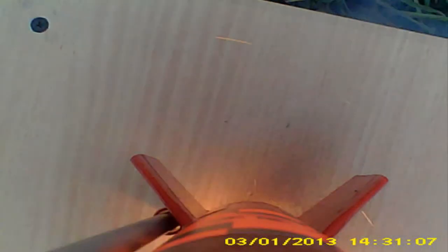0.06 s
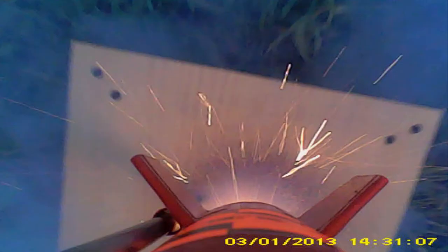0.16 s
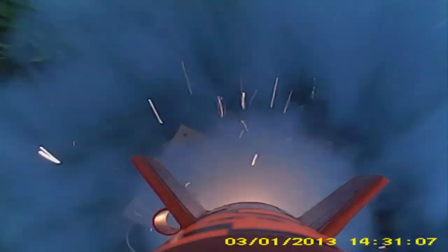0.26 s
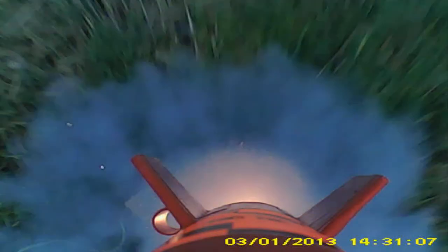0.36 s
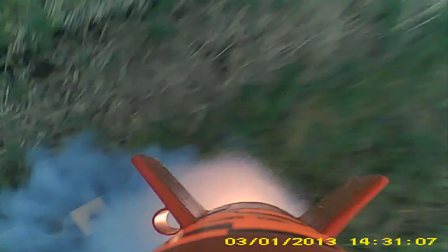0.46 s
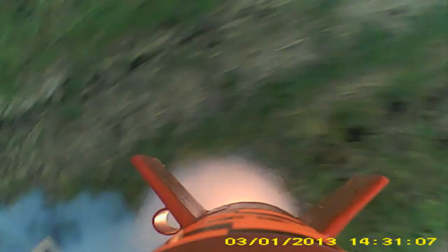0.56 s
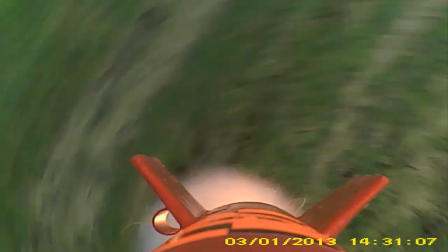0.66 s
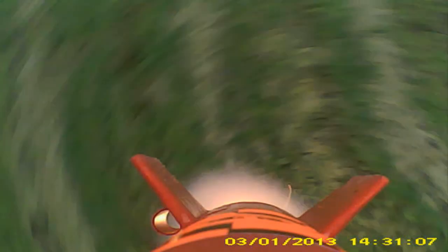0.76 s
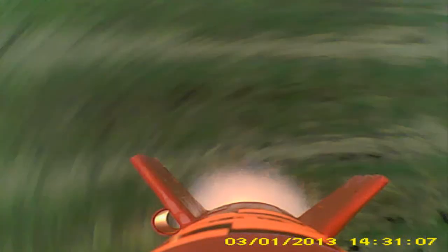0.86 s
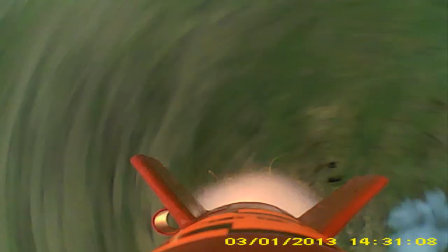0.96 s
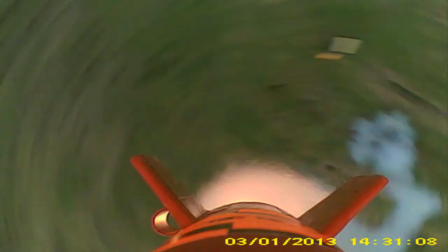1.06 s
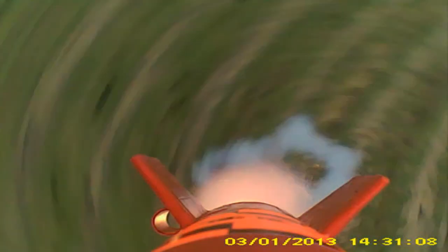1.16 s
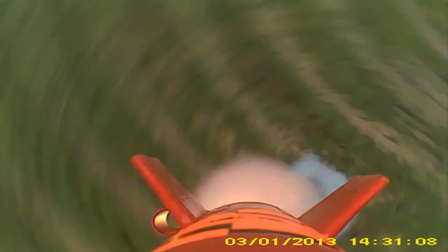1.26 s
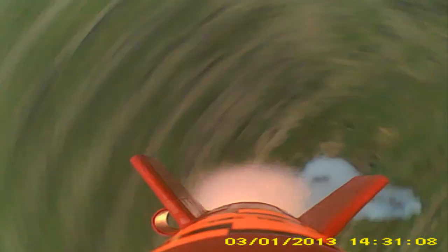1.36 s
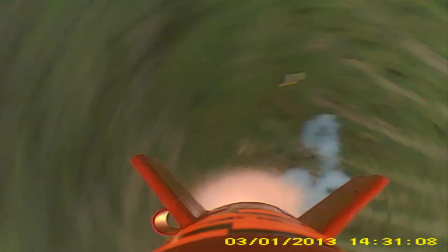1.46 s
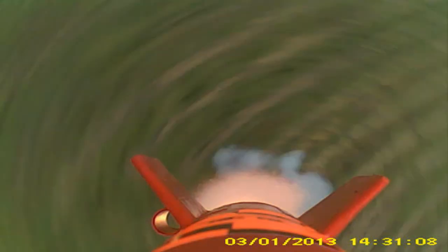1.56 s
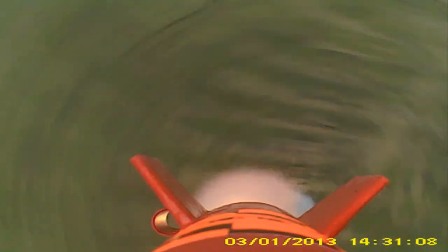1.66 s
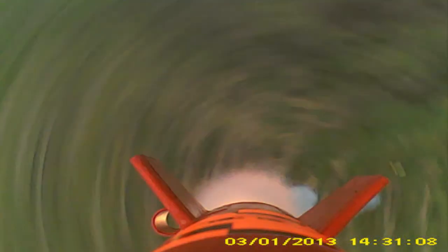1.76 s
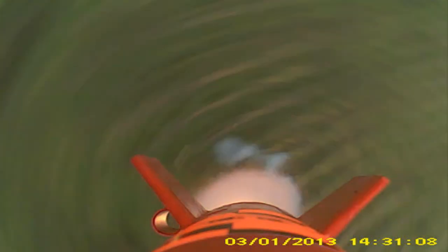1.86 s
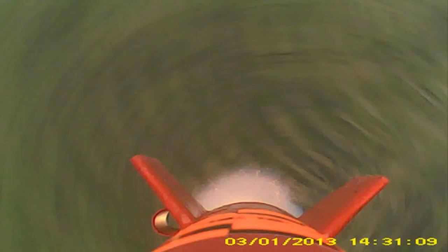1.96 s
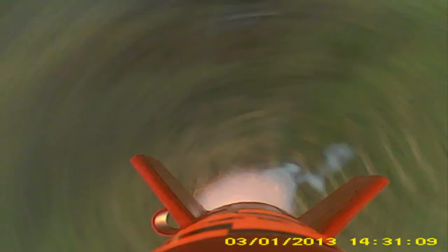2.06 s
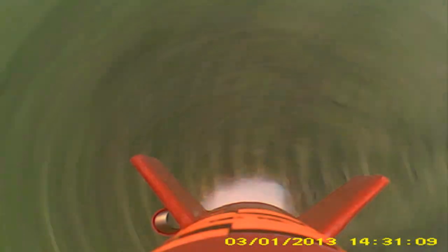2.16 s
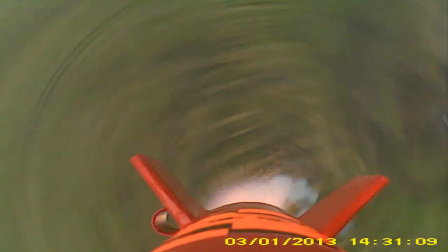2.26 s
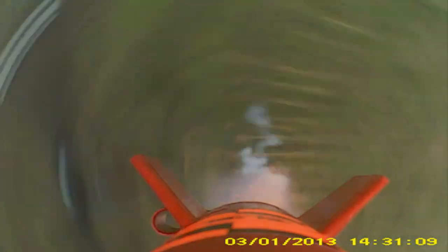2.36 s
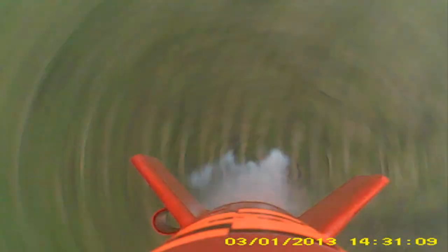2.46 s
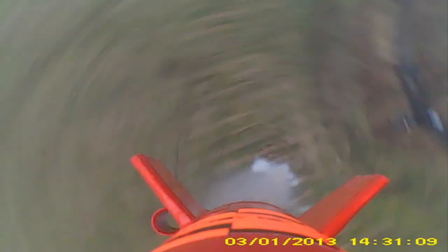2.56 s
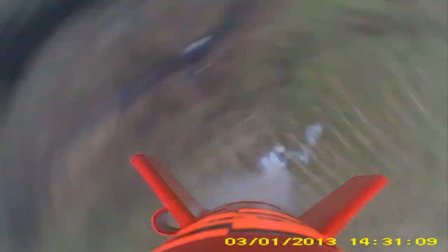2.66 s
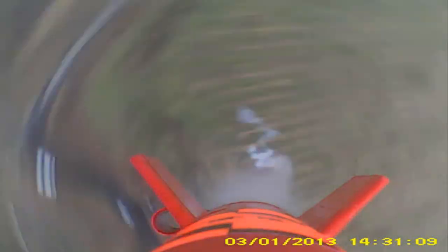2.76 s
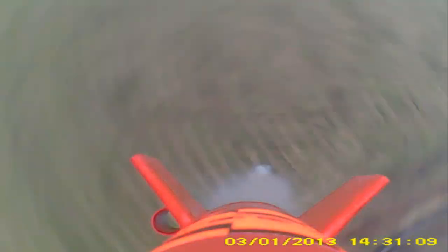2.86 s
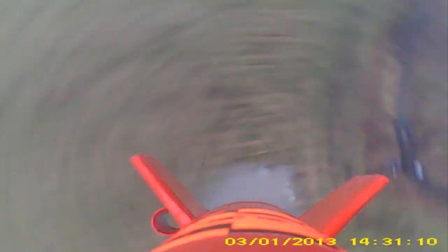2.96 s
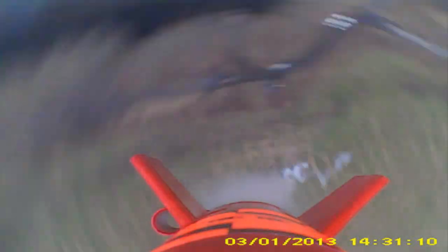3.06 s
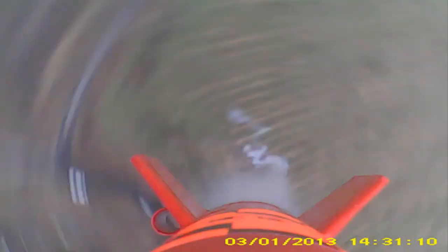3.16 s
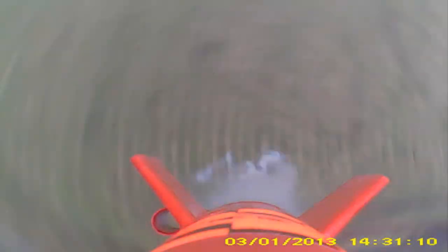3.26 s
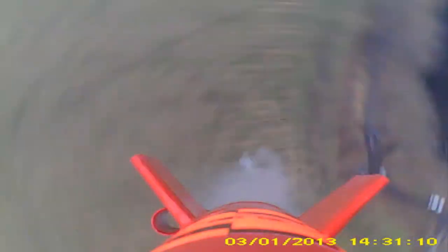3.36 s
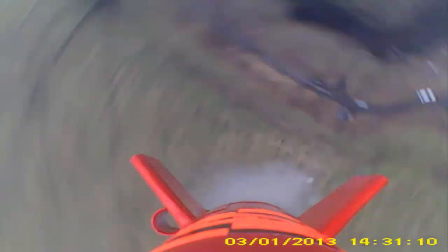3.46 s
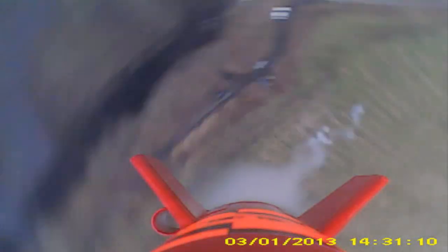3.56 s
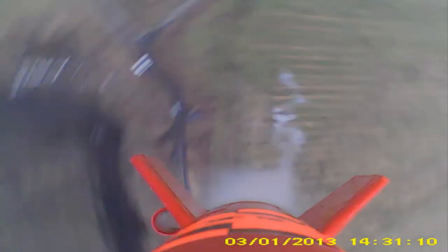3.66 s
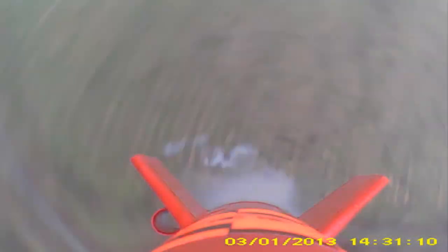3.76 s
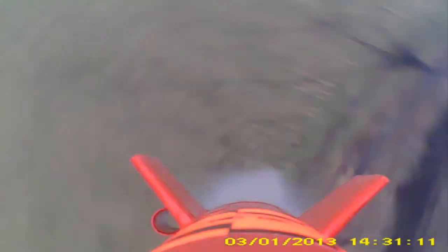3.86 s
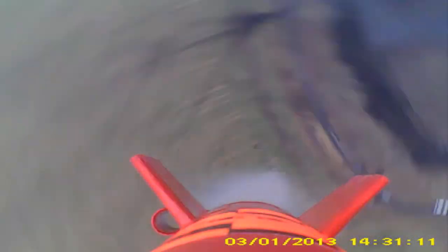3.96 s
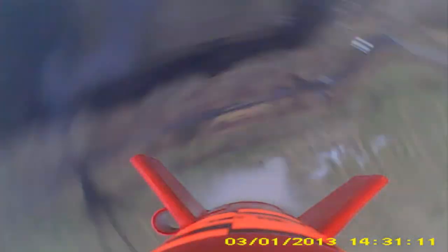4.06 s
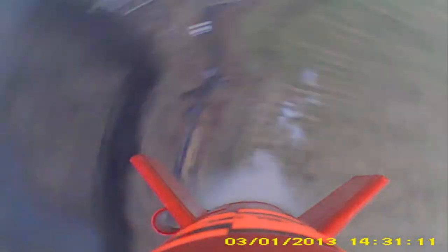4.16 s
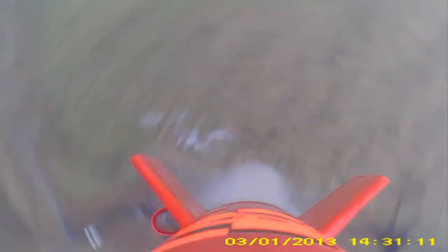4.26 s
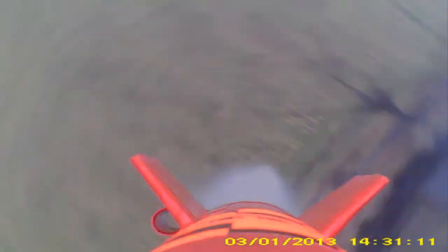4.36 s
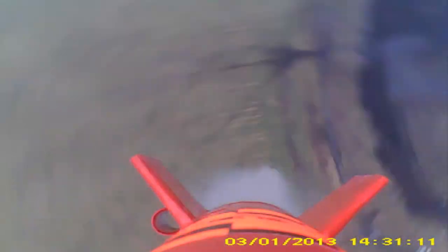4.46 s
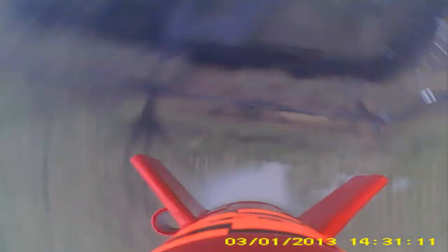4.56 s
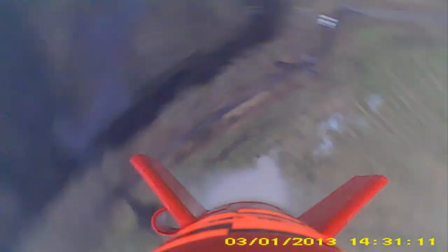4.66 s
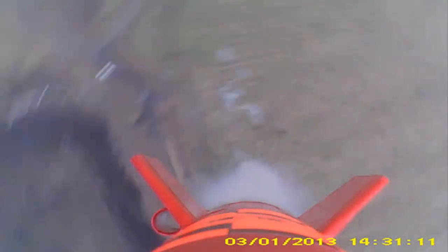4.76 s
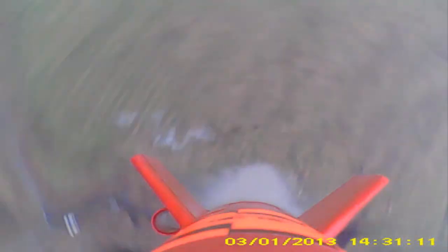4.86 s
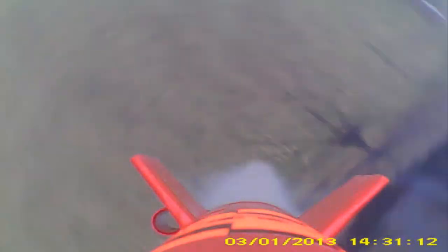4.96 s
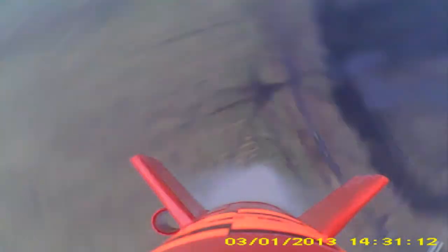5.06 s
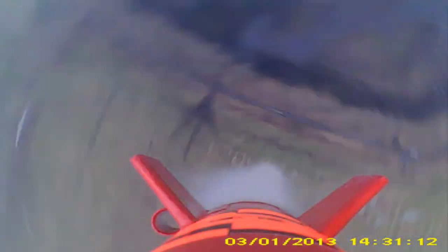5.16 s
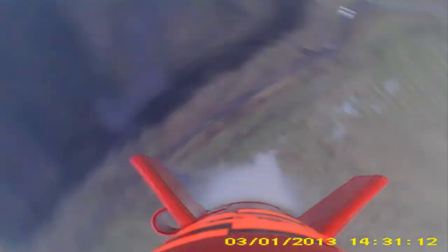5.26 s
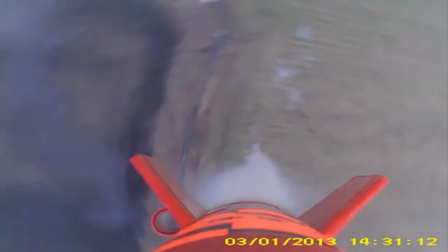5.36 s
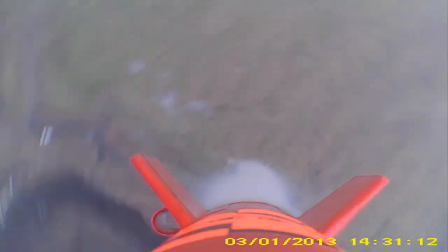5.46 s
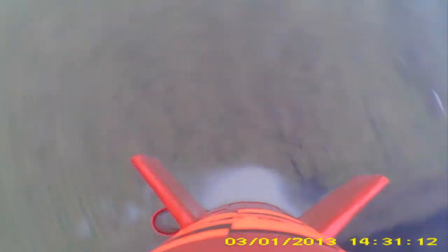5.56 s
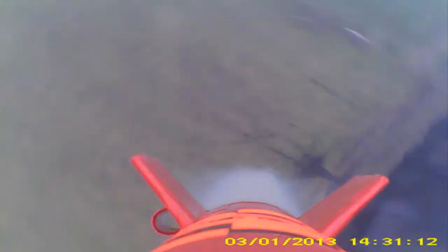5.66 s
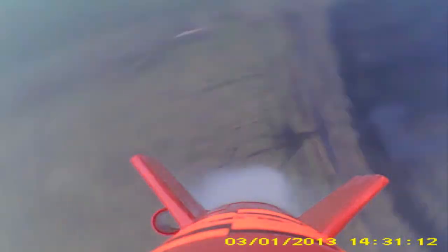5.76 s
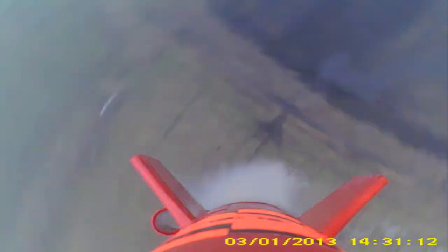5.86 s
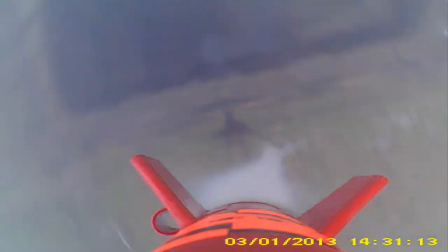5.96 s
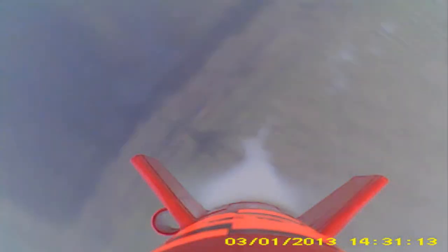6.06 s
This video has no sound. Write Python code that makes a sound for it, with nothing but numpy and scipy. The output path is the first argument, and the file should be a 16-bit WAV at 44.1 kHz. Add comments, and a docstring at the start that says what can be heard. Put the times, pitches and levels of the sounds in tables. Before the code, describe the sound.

Heard from a small onboard microphone, a rocket motor spits and roars alight, then buffeting air hisses and crackles as it coasts.

```python
"""A model rocket's exhaust and slipstream roar through the case of a small camera riding on it.
The igniter spits, the motor lights, the rocket climbs and coasts; a hollow rush of air swells at the end.
Eddies slam the tiny microphone against its stop, thousands of times a second at top speed (a harsh
hiss), then ever more rarely (a crackle) as the rocket slows."""
import sys
import numpy as np
from scipy import signal
from scipy.fft import rfft, irfft, next_fast_len
from scipy.io import wavfile
from scipy.ndimage import uniform_filter1d

SR = 44100
rng = np.random.default_rng(int(sys.argv[2]) if len(sys.argv) > 2 else 0)


def master(y):
    """Save y as 16-bit WAV."""
    cut = np.clip(np.atleast_2d(y).T, -1, 1)
    pcm = np.round(cut * 32767)  # scale
    wavfile.write(sys.argv[1], SR, pcm.astype(np.int16))


N = 269892
TIME = np.arange(N) / SR
IGNITION_S, LIFTOFF_S, CLEAR_S, BURNOUT_S = .127, .3, .503, 2.3


def undb(db):
    """Decibels to gain."""
    return 10 ** (np.asarray(db) / 20)


def unit(x):
    """Scale to rms 1."""
    return x / np.std(x)


def rise(at_s, length_s):
    """Smooth 0-to-1 step centred on at_s."""
    return .5 + .5 * np.tanh(2 * (TIME - at_s) / length_s)


def lowpass(x, hz):
    """One-pole low-pass."""
    pole = np.exp(-2 * np.pi * hz / SR)
    return signal.lfilter([1 - pole], [1, -pole], x)


def colour(x, spectrum):
    """Filter by (frequency [Hz], gain [dB]) points."""
    hz, db = np.transpose(spectrum)
    size = next_fast_len(N + 4096)
    bin_hz = np.maximum(np.arange(size // 2 + 1) * SR / size, 1)
    gain = undb(np.interp(np.log(bin_hz), np.log(hz), db))
    return irfft(rfft(x, size) * gain, size)[:N]


def flutter(rate_hz):
    """Ramps between random levels, rms 1."""
    hold = max(int(SR / rate_hz), 1)
    steps = np.repeat(rng.standard_normal(N // hold + 1), hold)
    return unit(uniform_filter1d(steps, hold)[:N])


def turbulence(spectrum):
    """Coloured flow noise, rms 1."""
    return unit(colour(rng.standard_normal(N), spectrum))


def resonance(hz, width_hz):
    """Noise band whose centre may move, rms 1."""
    real, imag = rng.standard_normal((2, N))
    baseband = lowpass(lowpass(real + 1j * imag, width_hz / 2), 2 * width_hz)
    carrier = np.exp(2j * np.pi * np.cumsum(hz * np.ones(N)) / SR)
    return unit(np.real(baseband * carrier))


# Igniter spits: (time [s], level [dB])
IGNITER_SPITS = [(0.0016, -12.5), (0.012, -13), (0.02, -14.5), (0.029, -13.5), (0.035, -10), (0.046, -12),
                 (0.0537, -13), (0.062, -7), (0.067, -24), (0.074, -11), (0.0809, -5), (0.087, -10),
                 (0.1172, -13.5), (0.124, -16)]
# Case modes: (frequency [Hz], t60 [s], level [dB])
CASE_MODES = [(526, 0.014, -1.5), (998, 0.013, -1.5), (1220, 0.026, -7), (1540, 0.019, -8)]
# Roar inside the case: (frequency [Hz], level [dB])
CASE_SPECTRUM = [(30, -30), (100, -15), (180, -5), (300, -1.5), (600, 0), (950, 0.5), (1300, -3),
                 (1700, -10.5), (2400, -22), (3900, -25)]
def igniter(ring_db=7.0, puff_db=-1.5, attack_s=.0009, puff_s=.0045):
    """Each spit is a short, rough puff of gas that rings the case."""
    t = TIME[:SR // 20]
    attack = 1 - np.exp(-t / attack_s)
    out, gas = np.zeros(N), turbulence(CASE_SPECTRUM)
    tunings = 1 + .075 * rng.standard_normal((len(IGNITER_SPITS), len(CASE_MODES)))
    for (at_s, db), tuning in zip(IGNITER_SPITS, tunings):
        ring = sum(undb(mode_db - 60 * t / t60) * np.sin(2 * np.pi * hz * ratio * t)
                   for (hz, t60, mode_db), ratio in zip(CASE_MODES, tuning))
        span = slice(int(at_s * SR), int(at_s * SR) + len(t))
        puff = gas[span] * np.exp(-(t / puff_s) ** 2)
        out[span] += undb(db) * (undb(ring_db) * ring + undb(puff_db) * puff) * attack
    return out


# Exhaust roar, until the rocket outruns it: (time [s], level [dB])
EXHAUST_ENVELOPE = [(.115, -25), (.17, -28.5), (.36, -27), (.46, -26), (.53, -21), (.63, -17.5),
                    (.71, -17.5), (.78, -16.5), (.91, -15.5), (1.0, -18.5), (1.13, -18.5), (1.22, -29),
                    (1.5, -42)]
def motor(peak_s=.28, rise_s=.06, fall_s=.1, hiss_db=-10, surge_db=-28.5, sag_oct_per_s=3.5):
    """Exhaust surges back off the pad; its whoosh falls as the gap under the nozzle opens."""
    times, db = np.transpose(EXHAUST_ENVELOPE)
    roar_gain = rise(times[0], .0033) * undb(np.interp(TIME, times, db))
    on_pad = rise(IGNITION_S, .0033) * (1 - rise(CLEAR_S, .045))
    surge = np.exp(-((TIME - peak_s) / np.where(TIME < peak_s, rise_s, fall_s)) ** 2)
    hiss_gain = np.hypot(roar_gain * undb(hiss_db), surge * undb(surge_db))
    whoosh_hz = 1630 * 2 ** (-sag_oct_per_s * (TIME - peak_s))
    whoosh = surge * resonance(whoosh_hz, width_hz=900)
    overload_share = on_pad * (.115 + .22 * surge) + .00085 * roar_gain / roar_gain.max()
    return roar_gain, hiss_gain, overload_share, whoosh


# Exhaust and late rush: (frequency [Hz], level [dB])
HOLLOW_SPECTRUM = [(30, -35), (100, -19.5), (180, -6), (300, -1.5), (600, 0.5), (950, 0.5), (1350, -3),
                   (1700, -9.5), (2400, -22), (3900, -24)]
def hollow_roar(gain):
    """Turbulent gas heard through the case."""
    return gain * turbulence(HOLLOW_SPECTRUM)


# Boom colour: (frequency [Hz], level [dB])
BOOM_SPECTRUM = [(25, -8), (70, -1), (150, 0), (380, -2), (650, -13), (1500, -35)]
# Boom envelope: (time [s], level [dB])
BOOM_ENVELOPE = [(.115, -28.5), (.22, -28.5), (.36, -25), (.46, -27.5), (.54, -46.5), (.75, -36),
                 (1.05, -28.5), (1.4, -38), (2.3, -27), (3.1, -39.5), (3.8, -58)]
def exhaust_boom():
    """Low boom: strong over the pad, gone once clear of it, back as speed builds."""
    times, db = np.transpose(BOOM_ENVELOPE)
    return rise(times[0], .01) * undb(np.interp(TIME, times, db)) * turbulence(BOOM_SPECTRUM)


def edge_tone(speed, motor_share, rest_hz=2650, rise_hz=1050):
    """Shrill band shed by the case's edges, in the pad blast and near top speed."""
    strength = 1.9 * motor_share + .75 * speed ** 8
    return strength * resonance(rest_hz + rise_hz * speed, width_hz=900)


def eddies(share, fine_share, drive, slow_hz=1304, fast_hz=3986, bass_db=.5):
    """1 while an eddy overloads the microphone, else 0; the driving flow bunches the hits."""
    slow = turbulence([(30, -15), (slow_hz / 3, -4), (slow_hz, 0),
                       (2 * slow_hz, -13), (10 * slow_hz, -60)])
    fast = turbulence([(30, bass_db), (400, bass_db), (fast_hz / 3, -2), (fast_hz, 0),
                       (2 * fast_hz, -15), (10 * fast_hz, -50)])
    push = np.sqrt(1 - fine_share) * slow + np.sqrt(fine_share) * fast - drive
    push /= np.sqrt(uniform_filter1d(push ** 2, size=SR // 200))
    threshold = np.interp(1 - share, np.linspace(0, 1, N), np.sort(push))
    return 1. * (push > threshold)


def microphone(pressure, overloaded, share, swing=.3, stop=.28, recoil_hz=850):
    """Soft-clips loud sound; an overload snaps it to its negative stop, and it rebounds past zero."""
    recoil = .56 * np.exp(-4.3 * share)  # dense blows cut the rebound short
    rebound = recoil * lowpass(lowpass(overloaded, recoil_hz), 2 * recoil_hz)
    free = swing * np.tanh((pressure + rebound) / swing)
    drift = .24 * lowpass(overloaded, hz=2.5)  # one-sided blows charge the coupling capacitor
    return np.where(overloaded > 0, -stop, free + drift)


# Electronic ticks: (time [s], level before low-pass [dB])
TICK_IMPULSES = [(.274, -35), (.615, -38), (.871, -41), (1.127, -39), (1.383, -29), (1.639, -27),
                 (1.767, -32), (1.81, -36), (2.023, -31), (2.066, -33), (2.194, -33), (2.279, -32),
                 (2.407, -32), (2.578, -36), (2.706, -35), (3.09, -35), (3.175, -29), (3.431, -32),
                 (3.986, -35), (4.199, -35), (4.455, -30), (4.839, -30), (5.138, -37), (5.65, -41)]
def ticks():
    """Faint, dull clicks of the camera's electronics."""
    times, db = np.transpose(TICK_IMPULSES)
    impulses = np.zeros(N)
    impulses[(times * SR).astype(int)] = undb(db)
    return lowpass(impulses, hz=3000)


def airspeed(climb_s=1.06, loss_per_s=.131):
    """Fraction of terminal speed: thrust builds it, drag and gravity cut it after burnout."""
    thrust_s = np.maximum(np.minimum(TIME, BURNOUT_S) - LIFTOFF_S, 0)
    coast_s = np.maximum(TIME - BURNOUT_S, 0)
    return np.maximum(np.tanh(thrust_s / climb_s) - loss_per_s * coast_s, 0)


def airflow(speed, roar_db=-24.5, hiss_db=-16, choke_db=-25, buffet_speed=.675, calm_s=5.625):
    """Air noise grows with speed; buffeting overloads the microphone and chokes the hiss."""
    buffeting = 1 / (1 + np.exp((buffet_speed - speed) / .055))
    roar_gain = undb(roar_db) * speed ** 2.35
    hiss_gain = undb(hiss_db + choke_db * buffeting ** 4) * speed ** 2.24
    wobble = .025 * rise(BURNOUT_S, .5)  # the unpowered rocket wobbles
    overload_share = (.295 * buffeting + wobble) * (1 - .78 * rise(calm_s, .015))
    return roar_gain, hiss_gain, overload_share


# Air over the camera: (frequency [Hz], level [dB])
SLIPSTREAM_SPECTRUM = [(30, -30.5), (200, -26.5), (500, -9.5), (850, -5), (1100, -2), (1350, 1.5),
                       (1650, 0), (2050, -2.5), (2400, -7.5), (3200, -10.5), (3900, -16)]
def flow_noise():
    """Hiss over the case and rumble inside it, each rms 1."""
    return turbulence(SLIPSTREAM_SPECTRUM), turbulence(CASE_SPECTRUM)


def sizzle(level_db=-27, fade_s=.22):
    """Thin sizzle that lingers as the rocket clears the pad."""
    fade = np.exp(-np.maximum(TIME - CLEAR_S, 0) / fade_s)
    return undb(level_db) * rise(CLEAR_S, .036) * fade * resonance(hz=3740, width_hz=500)


def hole_tone(speed, terminal_hz=1720.7, choke_speed=.88):
    """The microphone hole rings higher in faster air and chokes near top speed."""
    unchoked = 1 / (1 + np.exp((speed - choke_speed) / .035))
    return unchoked * rise(CLEAR_S, .05) * resonance(terminal_hz * speed ** .5, width_hz=560)


# Level dips: (time [s], depth [dB])
LEVEL_DIPS = [(.934, -10), (5.972, -7.5)]
def dips(recovery_s=.028):
    """Gain that drops abruptly and recovers."""
    return undb(sum(db * (TIME > at_s) * np.exp(-((TIME - at_s) / recovery_s) ** 2)
                    for at_s, db in LEVEL_DIPS))


# Single gusts: (time [s], length [s], extra overload share [0-1])
GUST_SLAPS = [(5.37, 0.008, 0.1), (5.6496, 0.004, 0.26), (5.674, 0.006, 0.2), (5.6906, 0.003, 0.15),
              (5.7, 0.0015, 0.15), (5.712, 0.012, 0.07), (5.724, 0.002, 0.15), (5.751, 0.0015, 0.1)]
def gust_slaps():
    """Late in the coast, buffeting breaks up into gusts that slap the microphone."""
    return sum(extra * (abs(TIME - at_s) < length_s / 2) for at_s, length_s, extra in GUST_SLAPS)


def late_rush(at_s=5.775, roar_db=-17, ring_db=-18.5, start_hz=1279, sag_hz_per_s=400):
    """Smooth, hollow rush of air with a sagging resonance."""
    ring = resonance(start_hz - sag_hz_per_s * np.maximum(TIME - at_s, 0), width_hz=590)
    return rise(at_s, .11) * (hollow_roar(undb(roar_db)) + undb(ring_db) * ring)


def scene():
    """Igniter, exhaust and slipstream at the buffeted microphone."""
    speed = airspeed()
    motor_gain, motor_hiss_gain, motor_share, whoosh = motor()
    air_gain, air_hiss_gain, air_share = airflow(speed)
    gust = flutter(rate_hz=80)  # from the rocket's spin and wobble
    slipstream, rumble = flow_noise()
    hole = hole_tone(speed)
    boom = exhaust_boom()
    fizz_gain = undb(-31) * (TIME < IGNITION_S)  # igniter burning between spits
    roar = hollow_roar(motor_gain) + rumble * (air_gain + fizz_gain) + boom
    roar *= undb(.74 * flutter(rate_hz=30))
    hiss = slipstream * np.hypot(motor_hiss_gain, air_hiss_gain) * undb(.4 * gust) + sizzle()
    hole_gain = np.hypot(undb(-23.5) * speed ** 1.5, undb(-7.5) * motor_gain)
    ring = hole * hole_gain + undb(-18) * whoosh

    share = np.clip(motor_share + air_share, 1e-4, .5)  # fraction of time overloaded
    clustered = share * undb(1.9 * gust * np.exp(-share / .17))  # rare overloads bunch up
    slaps = gust_slaps()
    drive = .28 * slipstream + .42 * hole + .38 * whoosh + 3.3 * boom + .33 * speed ** 8 * rumble
    drive += edge_tone(speed, motor_share)
    # faster air has smaller eddies
    fine_share = np.clip(((share + .6 * slaps) / .28) ** 2 * (.65 + speed), 0, 1)
    overloaded = eddies(np.clip(clustered + slaps, 0, .6), fine_share, drive)
    pressure = hiss + (roar + ring + late_rush()) * dips() + igniter()
    return microphone(pressure, overloaded, share)[None]


# Camera's smoothing filter: (frequency [Hz], gain [dB])
SMOOTHING_RESPONSE = [(20, -1.5), (100, -2), (1000, -1), (2000, -2.1), (3000, -5), (3600, -6.5),
                      (4000, -10.5), (4500, -15.5), (5000, -23.5), (6000, -37), (6600, -49), (7400, -63),
                      (8400, -72.5), (9500, -67.5)]
def record(dry, camera_hz=8000, top_hz=12200):
    """The camera samples coarsely and unfiltered, so sharp edges alias into hiss; then it smooths."""
    instants = np.arange(N * camera_hz // SR + 2) * SR / camera_hz
    samples = dry[0][np.minimum(np.round(instants).astype(int), N - 1)]
    centred = signal.sosfilt(signal.butter(1, 15, "high", fs=camera_hz, output="sos"), samples)
    common_hz = np.lcm(SR, camera_hz)
    up, down = common_hz // camera_hz, common_hz // SR
    kernel = signal.firwin(8 * up + 1, 1.5 * camera_hz, fs=common_hz, window=("kaiser", 9))
    upsampled = signal.resample_poly(centred, up, down, window=kernel)[:N]
    sound = colour(upsampled, SMOOTHING_RESPONSE) + ticks()
    return signal.sosfilt(signal.ellip(8, .2, 70, top_hz, fs=SR, output="sos"), sound)[None]


dry = scene()
out = record(dry)
master(out)
```